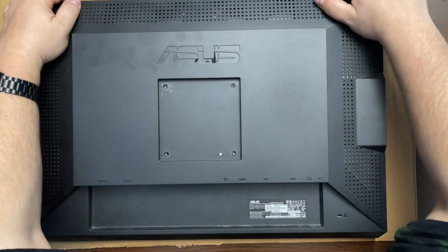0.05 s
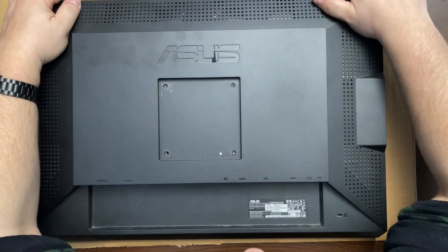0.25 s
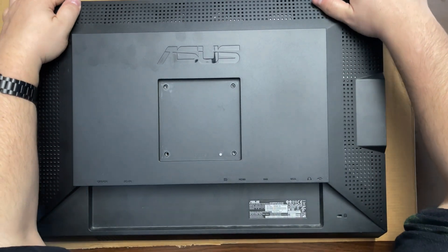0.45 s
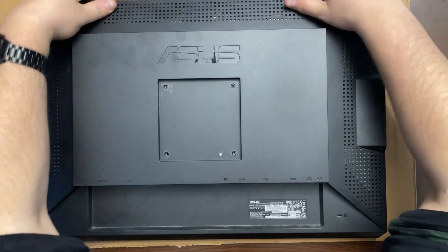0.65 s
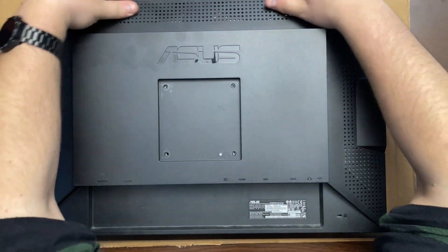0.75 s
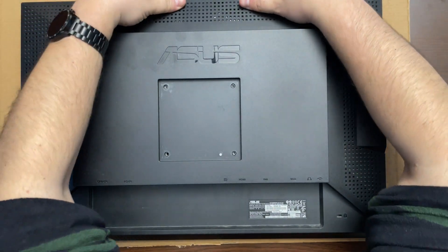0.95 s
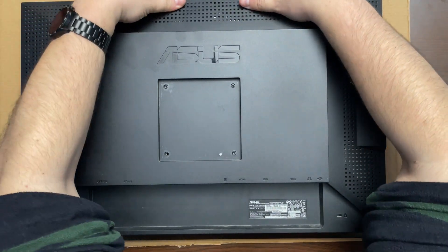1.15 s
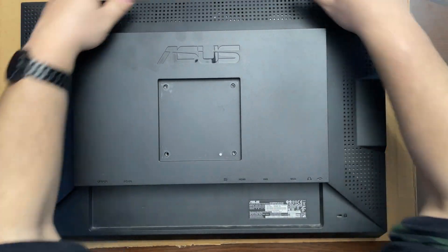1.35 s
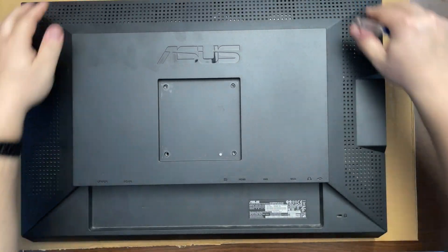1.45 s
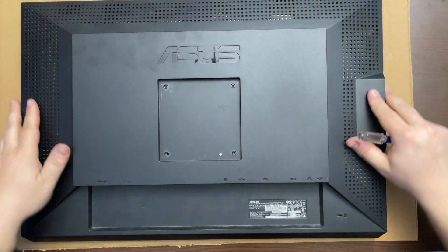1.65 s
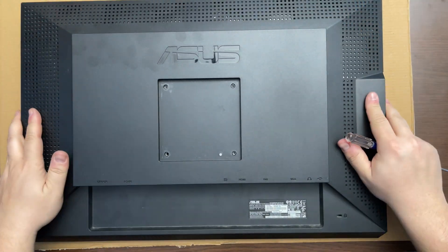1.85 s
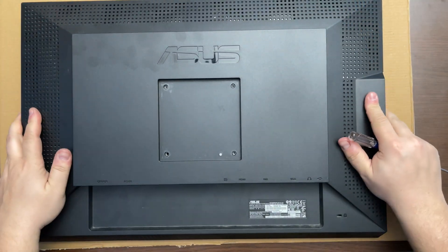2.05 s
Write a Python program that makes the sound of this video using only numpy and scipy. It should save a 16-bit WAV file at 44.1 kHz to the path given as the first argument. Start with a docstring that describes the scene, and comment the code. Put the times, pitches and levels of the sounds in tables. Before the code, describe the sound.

A plastic cover snaps sharply onto a hollow housing, then hands rub and tick lightly on it

```python
"""Plastic cover snapping home

Hands press a plastic back cover onto a monitor housing on a desk in a small room.
A clip catches, then the cover snaps home: bursts of tiny slips crackle and ring the modes of the shell.
Palms slide as filtered grains, a finger squeaks in three harmonics, small clips and fingertips tick,
and the desk jolts under the snap and rumbles under the pushes, over a bed of air noise."""
import sys
import numpy as np
from scipy import signal
from scipy.fft import rfft, irfft
from scipy.io import wavfile
from scipy.ndimage import uniform_filter1d

SR = 44100
rng = np.random.default_rng(int(sys.argv[2]) if len(sys.argv) > 2 else 0)


def makeup_ratio(level_db):
    """Linear amplitude ratio for a level in decibels (20 dB per factor of ten)."""
    decades = np.asarray(level_db, float) / 20
    return 10 ** decades


def to_wav(s):
    """Save 16-bit WAV."""
    ch = np.atleast_2d(s).T  # columns
    pcm = np.round(np.clip(ch, -1, 1) * 32767)  # PCM
    wavfile.write(sys.argv[1], SR, pcm.astype(np.int16))


N = 92610  # length of the scene in samples, 2.1 s

# palms and fingers sliding: start_s, peak_s, end_s, hiss_db, shell drone_db (rms at the peak)
STROKE_ROWS = [(-.1, 0, 0.11, -53.5, -59), (0.509, 0.51, .56, -56, -65), (0.536, 0.66, 0.87, -48.5, -55),
               (0.736, 0.88, 0.97, -42.5, -49), (1.012, 1.054, 1.15, -58, -59),
               (1.197, 1.222, 1.25, -61, -58), (1.255, 1.297, 1.354, -46.5, -51.5),
               (1.581, 1.596, 1.612, -48.5, -59), (1.588, 1.637, 1.809, -50, -59.5),
               (1.745, 1.78, 1.873, -59, -58.5), (1.92, 2.05, 2.12, -56, -60.5)]
# bright rub of skin on the grain: pitch_hz, relative level_db per Hz
HISS_COLOUR = [(1500, -30.5), (2500, -7), (3500, -8.5), (4400, -16.5), (6800, -9), (10500, -14),
               (14700, -1.5), (16400, -16)]
# duller answer of the shell to the rub: pitch_hz, relative level_db per Hz
DRONE_COLOUR = [(90, -26), (220, -7.5), (400, -3.5), (900, -2), (4000, -8), (6000, -53)]
# desk and hands moving: time_s, level_db (rms)
RUMBLE_LEVEL = [(0.0, -64.5), (0.18, -58.5), (0.34, -67), (0.45, -76), (0.6, -66.5), (0.95, -64),
                (1.07, -53.5), (1.23, -59), (1.43, -61), (1.69, -63), (1.88, -62), (2.1, -53)]
# tone of that rumble: pitch_hz, relative level_db per Hz
RUMBLE_TONE = [(12, -21), (22, -2.5), (75, -4.5), (260, -19), (450, -43)]
# tone of the air in the room: pitch_hz, relative level_db per Hz
AIR_COLOUR = [(60, -27), (100, -9), (255, -2), (500, -6.5), (1700, -12), (5200, -23), (7300, -16),
              (10000, -23.5), (16000, -19)]
# dying away of the room: pitch_hz, t60_s
ROOM_DECAY = [(100, 0.34), (1000, 0.33), (5000, 0.37), (14000, 0.24)]
# clips catching and fingertips landing: start_s, crackle_db, knock_db (both nominal peaks),
# centre_hz of the knock, lead_s of the crackle
CLICK_ROWS = [(0.169, -21, -22.5, 1420, .004), (0.2047, -30, -22.5, 1300, 0.00058),
              (0.2169, -6.5, -11, 1970, 0.006), (0.2284, -23, -22, 795, 0.0052),
              (.473, -66, -51.5, 2800, 0.0012), (0.5124, -45, -37.5, 760, 0), (1.040, -44, -50, 2999, .002),
              (1.048, -43, -39.5, 2060, 0.0076), (1.0588, -41, -35.5, 1750, 0.0034),
              (1.294, -62, -35.5, 326, 0.0024), (1.789, -37.5, -35.5, 1640, 0.0052),
              (1.874, -57, -45, 3730, 0), (1.9021, -32.5, -25.5, 1300, 0.0016),
              (1.915, -55, -33.5, 1000, 0.00023), (1.956, -45, -45.5, 6360, 0),
              (1.992, -59, -33.5, 1240, 0), (2.011, -62, -41.5, 347, 0.0013)]
# tone of the crackle: pitch_hz, relative level_db per Hz
CRACKLE_COLOUR = [(3000, -35), (4200, -10.5), (5100, -7.5), (7000, 2), (10000, -5.5), (13300, 1.5),
                  (15500, 1.5), (16500, -17)]
# short modes of the shell: pitch_hz, relative level_db
SHELL_MODES = [(240, -12.5), (357, -20), (520, -11.5), (642, -20), (850, -3), (1000, -6), (1200, 1.5),
               (1420, -6.5), (1660, -2), (2150, 0), (2400, 0), (2830, 3), (3700, 6), (4300, 5), (5400, 2.5),
               (6200, -4)]
# long modes of the cover under the snap: pitch_hz, level_db, t60_s
PANEL_MODES = [(240.2, -30, 0.29), (358, -36, 0.33), (635, -34.5, 0.26), (984, -40, 0.41)]
# balance of squeak harmonics 1 to 3: level_db before their swells and a common doubling
SQUEAK_HARMONICS = [-55, -52, -63]


def evened(x):
    """Scales to rms 1."""
    return x / np.sqrt(np.mean(x ** 2) + 1e-20)


def read(points, hz):
    """Reads a table on a log-frequency axis."""
    f, value = np.transpose(points)
    return np.interp(np.log(hz + 1), np.log(f + 1), value)


def add(mix, start_s, sound):
    """Adds a sound at a time, cut off at the end of the mix."""
    part = mix[round(start_s * SR):][:len(sound)]
    part += sound[:len(part)]


def colour(points, size=4096):
    """Minimum-phase filter with the given spectrum, so that nothing sounds ahead of its cause."""
    half = np.maximum(read(points, np.fft.rfftfreq(size, 1 / SR)), -80) * np.log(10) / 20
    log_gain = np.concatenate([half, half[-2:0:-1]])
    return np.fft.ifft(np.exp(np.conj(signal.hilbert(log_gain)))).real[:size // 2]


def grains(size, per_s, spread_db):
    """Sparse clicks of random sign, a few of them large."""
    chance, side, rarity = rng.random((size, 3)).T
    size_db = spread_db * np.minimum(-np.log(rarity + 1e-9), 4)
    return (chance < per_s / SR) * np.sign(side - .5) * makeup_ratio(size_db)


def flicker(cutoff_hz):
    """Slow random wandering of rms 1."""
    lowpass = signal.butter(2, cutoff_hz, fs=SR, output="sos")
    return evened(signal.sosfilt(lowpass, rng.standard_normal(N)))


def steady(points):
    """Noise of a given spectrum, rms 1."""
    hz = np.fft.rfftfreq(N, 1 / SR)
    return evened(irfft(rfft(rng.standard_normal(N)) * makeup_ratio(read(points, hz)), N))


def slide():
    """Skin catches on the grain of the plastic: a bright hiss and a duller drone of the shell."""
    grains_per_s, spread_db, patchy_db, patchy_hz = 12000, 2.6, 1.3, 40.
    onset_bend, release_bend = 0.64, 0.94
    rub = [grains(N, grains_per_s, spread_db) * makeup_ratio(patchy_db * flicker(patchy_hz)) for hand in range(2)]
    hiss = evened(signal.oaconvolve(rub[0], colour(HISS_COLOUR))[:N])
    drone = evened(signal.oaconvolve(rub[0] + rub[1], colour(DRONE_COLOUR))[:N])
    t = np.arange(N) / SR
    start, peak, end, hiss_db, drone_db = np.transpose(STROKE_ROWS)[:, :, None]
    onset = np.sin(np.pi / 2 * np.clip((t - start) / (peak - start), 0, 1))
    release = np.sin(np.pi / 2 * np.clip((end - t) / (end - peak), 0, 1))
    power = (onset ** onset_bend * release ** release_bend) ** 2
    # overlapping strokes add in power
    hiss_gain = np.sqrt((power * makeup_ratio(2 * hiss_db)).sum(0))
    drone_gain = np.sqrt((power * makeup_ratio(2 * drone_db)).sum(0))
    return hiss_gain * hiss + drone_gain * drone


def rumble():
    """Low noise of the desk and hands moving, swelling under the pushes."""
    time_s, level_db = np.transpose(RUMBLE_LEVEL)
    return makeup_ratio(np.interp(np.arange(N) / SR, time_s, level_db)) * steady(RUMBLE_TONE)


def air():
    """Steady coloured noise of the room's air."""
    return makeup_ratio(-58.5) * steady(AIR_COLOUR)


def room(x):
    """Sparse reflections, each band dying at its own speed.

    Three tails swap continuously, 60 turns a second, so close clicks get different reflections."""
    level_db, gap_s, turns_per_s = -9, 0.0072, 60
    out = np.zeros(N)
    turn = np.arange(N) * turns_per_s / SR
    for k in range(3):
        taps = np.zeros(SR // 2)
        at = np.arange(round(gap_s * SR), SR // 2 - 20, 10)
        taps[at + rng.integers(0, 10, len(at))] = rng.choice([-1., 1.], len(at))
        hz, t, bands = signal.stft(taps, SR, nperseg=256)
        fading = bands * makeup_ratio(-60 * t / read(ROOM_DECAY, hz)[:, None])
        tail = signal.istft(fading, SR, nperseg=256)[1]
        share = np.sqrt(2 / 3) * np.cos(2 * np.pi * (turn + k / 3))  # the three powers sum to 1
        out += signal.fftconvolve(x * share, tail / np.linalg.norm(tail))[:N]
    return makeup_ratio(level_db) * out


def click(start_s, crackle_db, knock_db, centre_hz, lead_s):
    """A burst of tiny slips crackles, and a rough push rings the shell; returns its time and sound."""
    slips_per_s, slip_spread_db = 14000, 3.0
    push_s, rattle_db, rattle_s = .0045, -7.5, 0.0098  # loose edges chatter on after the push
    mode_shift = .03  # each spot rings the modes up to this share apart
    narrow_db = 0.29  # loss one octave above the centre, per dB of softness
    lean = 1.5  # a knock loses more below its centre than above
    ring_cycles = 14  # cycles until a mode has died by 60 dB
    t = np.arange(0, .15, 1 / SR)
    slips = grains(len(t), slips_per_s, slip_spread_db)

    u = t / (.0044 * (1.5 + .013 * crackle_db))  # harder clicks crackle longer
    crackle = signal.fftconvolve(slips * u ** 2 * np.exp(-u ** 2), colour(CRACKLE_COLOUR))[:len(t)]

    hz, db = np.transpose(SHELL_MODES)[:, :, None]
    hz = hz * (1 + mode_shift * rng.uniform(-1, 1, hz.shape))
    octaves = np.log2(hz / centre_hz)
    db = db + narrow_db * knock_db * octaves ** 2 * np.where(hz < centre_hz, lean, 1)
    modes = makeup_ratio(db - 60 * t * hz / ring_cycles) * np.sin(2 * np.pi * hz * t)
    ring = modes[::2].sum(0) - modes[1::2].sum(0)  # neighbouring modes start in opposite directions
    after = t - lead_s
    rattle = makeup_ratio(rattle_db) * np.exp(-abs(after) / rattle_s)
    push = (after >= 0) * (np.exp(-(after / push_s) ** 2) + rattle)
    knock = signal.fftconvolve(slips * push, ring)[:len(t)]
    knock = signal.sosfilt(signal.butter(2, 170, "high", fs=SR, output="sos"), knock)

    head = round(.012 * SR)  # each part is levelled over its first 12 ms
    crackle = makeup_ratio(crackle_db) * crackle / np.std(crackle[:head])
    knock = makeup_ratio(knock_db) * knock / np.std(knock[:head])
    return start_s - lead_s, (crackle + knock) / 4  # nominal peak is four times the rms


def thump():
    """The desk jolts under the snap in a falling low tone, and the cover rings on in smeared modes."""
    jolt_db, jolt_hz, jolt_t60_s, fall_s = -27.5, 103, 0.17, .02  # the pitch halves after fall_s
    smear, swell_s = .09, 0.0054  # the rattling seam smears each mode over this share of its pitch
    t = np.arange(0, .4, 1 / SR)
    turns = jolt_hz * fall_s * np.log(1 + t / fall_s)
    jolt = makeup_ratio(jolt_db - 60 * t / jolt_t60_s) * np.sin(2 * np.pi * turns)
    hz, db, t60 = np.transpose(PANEL_MODES)[:, :, None]
    sway = []
    for f in hz[:, 0]:
        noise = rng.standard_normal((2, len(t)))
        sway.append(evened(uniform_filter1d(noise, round(SR / (smear * f)), axis=1)))
    a, b = np.transpose(sway, (1, 0, 2))
    wave = (a * np.sin(2 * np.pi * hz * t) + b * np.cos(2 * np.pi * hz * t)) / np.sqrt(2)
    ring = (makeup_ratio(db - 60 * t / t60) * wave).sum(0)
    return jolt + np.minimum(t / swell_s, 1) ** 2 * ring


def squeak():
    """A finger sticks and slips evenly for a moment, its pitch sagging."""
    length_s, pitch_hz, sag_hz = 0.066, 274.7, 8.3
    t = np.arange(0, length_s, 1 / SR)
    u = t / length_s
    turns = np.cumsum(pitch_hz - sag_hz * u ** 3) / SR
    swells = [u ** .8, (1 - u) ** .4, u ** .8]  # the octave leads, the fundamental follows
    tone = np.zeros(len(t))
    for k, db in enumerate(SQUEAK_HARMONICS):
        tone += makeup_ratio(db) * swells[k] * np.sin(2 * np.pi * (k + 1) * turns)
    return 2 * np.sin(np.pi * u) ** .6 * tone


def scene():
    """Slides, clicks and a squeak in the room, over rumble and air, with the dry thump on top."""
    near = slide()
    for row in np.array(CLICK_ROWS):
        add(near, *click(*row))
    add(near, .84, squeak())
    out = near + room(near) + rumble() + air()
    add(out, .213, thump())
    return out[None]


def band_limit(x):
    """A steep low-pass at the top of the band."""
    return signal.sosfilt(signal.butter(12, 16810, fs=SR, output="sos"), x)


def record(dry):
    """Limits the treble to 15.9 kHz and finishes the mix."""
    lowpass = signal.firwin(511, 15900, window=("kaiser", 9), fs=SR)
    mix = signal.oaconvolve(dry, lowpass[None], "same")
    return band_limit(mix)


dry = scene()
out = record(dry)
to_wav(out)
```